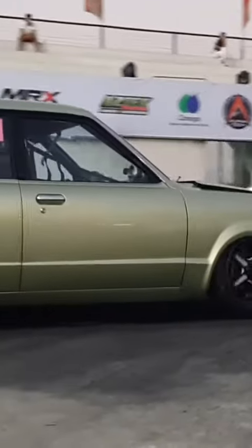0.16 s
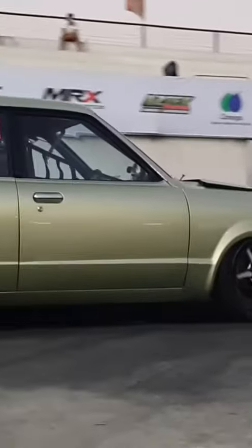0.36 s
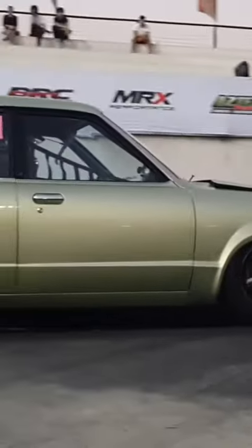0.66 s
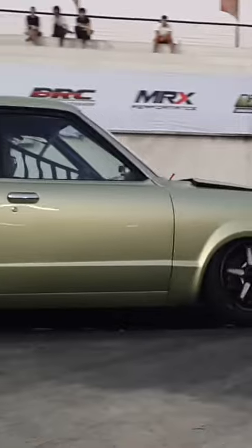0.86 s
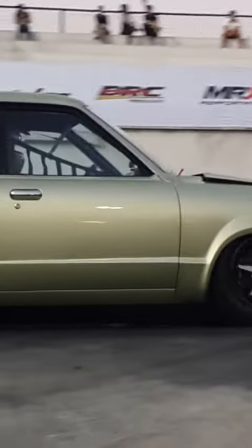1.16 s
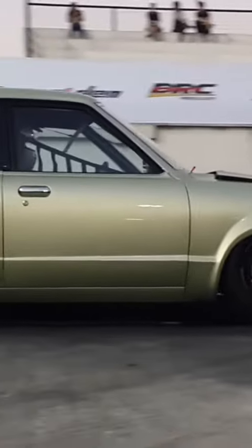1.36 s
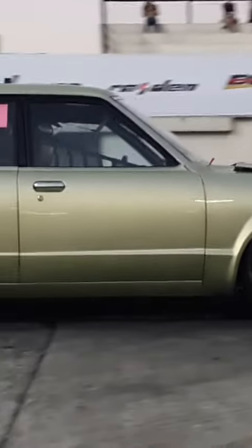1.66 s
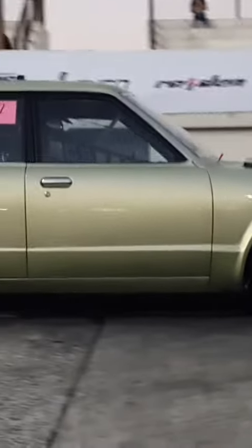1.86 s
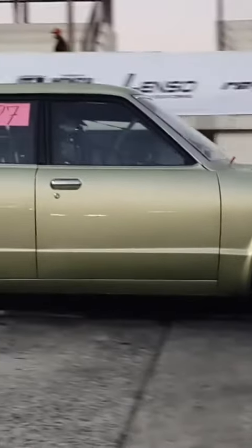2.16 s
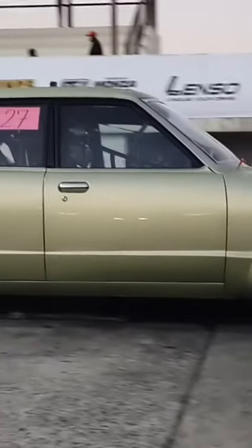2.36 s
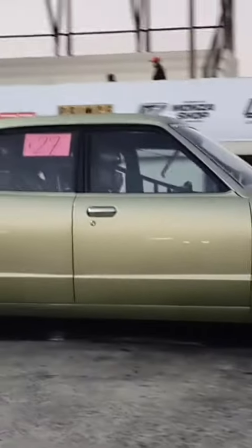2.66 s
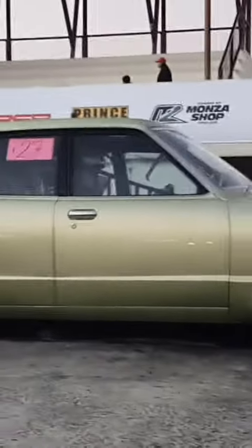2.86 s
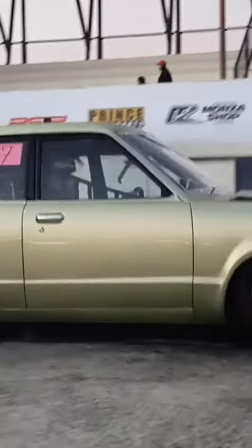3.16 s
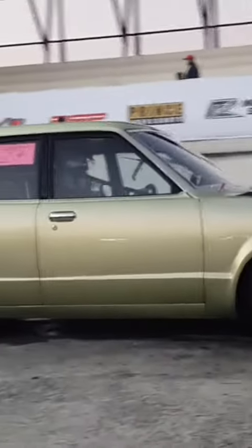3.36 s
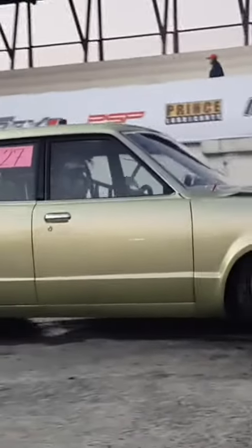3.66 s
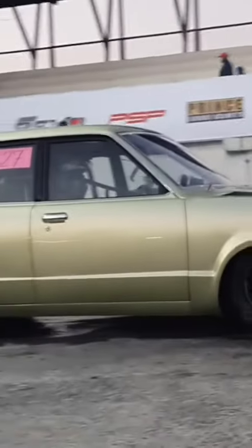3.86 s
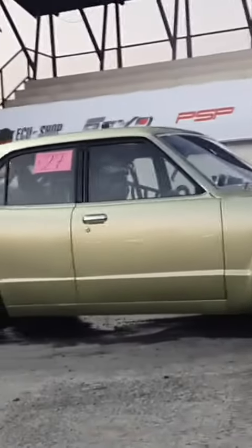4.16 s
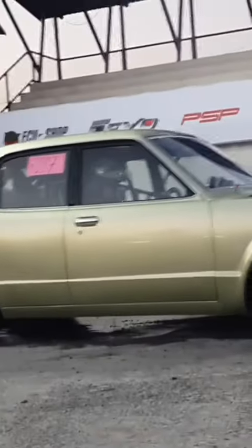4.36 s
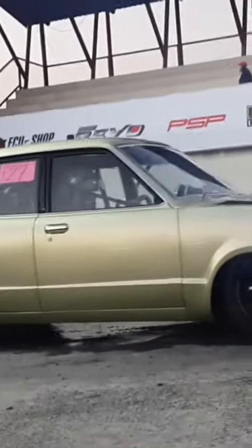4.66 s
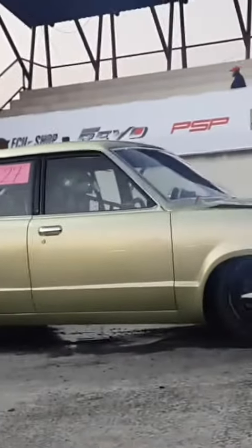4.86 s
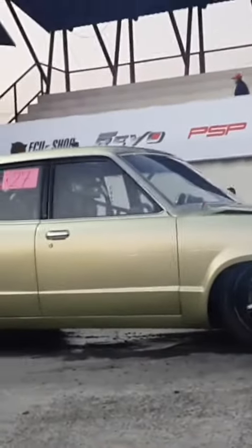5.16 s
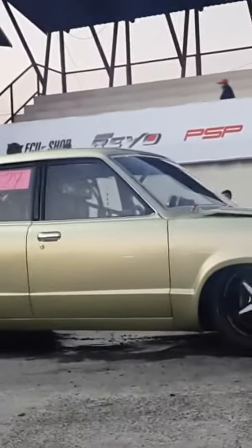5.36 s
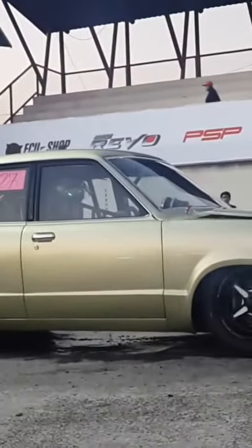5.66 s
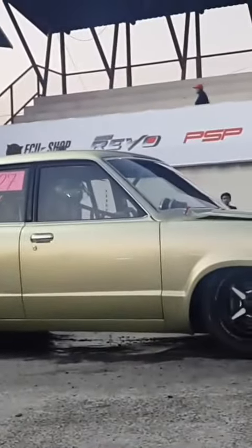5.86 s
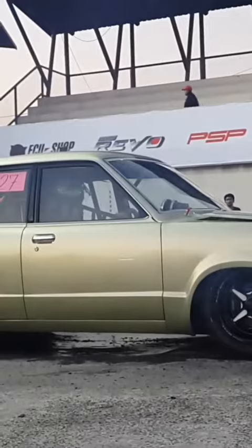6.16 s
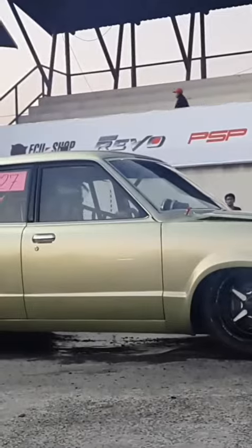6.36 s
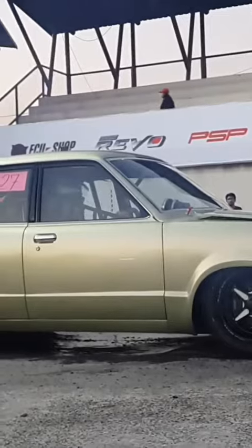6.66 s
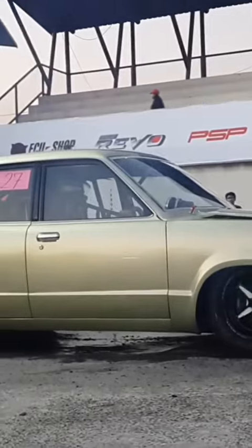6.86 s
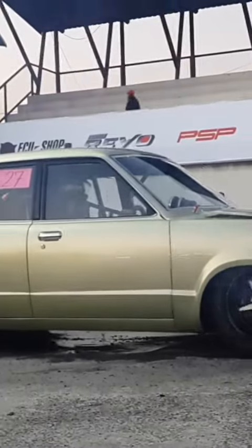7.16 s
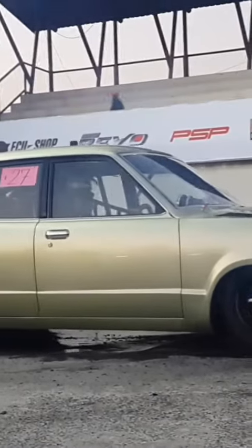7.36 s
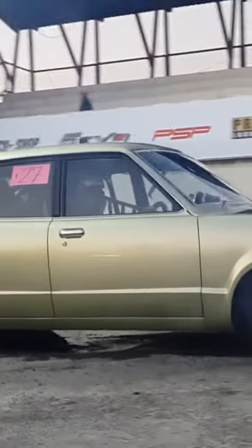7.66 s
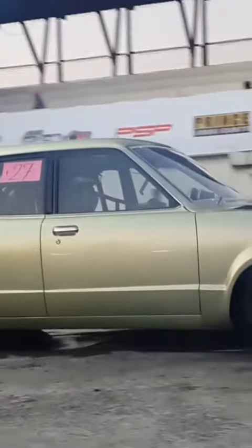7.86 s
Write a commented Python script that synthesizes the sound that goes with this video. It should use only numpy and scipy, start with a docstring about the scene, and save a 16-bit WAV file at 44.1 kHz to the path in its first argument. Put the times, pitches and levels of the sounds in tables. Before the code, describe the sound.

A rotary-engined drag car creeps past, idling in ragged, popping surges with bursts of exhaust hiss, then is revved in three quick blips.

```python
"""Rotary drag car creeping past

A ported rotary rolls by a few metres away, idling in ragged surges, then is blipped three times.
Each firing bangs the exhaust and blows a jet of hiss; between surges the rotors misfire, puff softly
and lose speed. Under it the engine bay throbs, gears whine faintly and a grandstand echoes briefly."""
import sys
import numpy as np
from scipy import signal
from scipy.fft import rfft, irfft, next_fast_len
from scipy.io import wavfile
from scipy.ndimage import uniform_filter1d

SR = 44100
rng = np.random.default_rng(int(sys.argv[2]) if len(sys.argv) > 2 else 0)


def master(y):
    """Save y as 16-bit WAV."""
    cut = np.clip(np.atleast_2d(y).T, -1, 1)
    pcm = np.round(cut * 32767)  # scale
    wavfile.write(sys.argv[1], SR, pcm.astype(np.int16))


N = 352797
TIME = np.arange(N) / SR

# Colour of the gas jet at the tailpipe. Each row: frequency in Hz, spectral level in dB.
JET_SPECTRUM = [(700, -12), (1500, -3.5), (2300, -4), (3300, -15.5), (4200, -5), (5400, 2.5), (6900, 7.5),
                (8200, 3.5), (9500, -4), (11000, 0.5), (13000, -5)]


def undb(db):
    """Decibels to gain."""
    return 10 ** (np.asarray(db) / 20)


def unit(x):
    """Scale to rms 1."""
    return x / np.sqrt(np.mean(x ** 2))


def curves(table):
    """Automation lanes: each column after the first, joined by straight lines in time."""
    seconds, *columns = np.transpose(table)
    return [np.interp(TIME, seconds, column) for column in columns]


def colour(x, points):
    """Equalise through (Hz, dB) points."""
    hz, db = np.transpose(points)
    size = next_fast_len(x.shape[-1], True)
    f = np.fft.rfftfreq(size, 1 / SR) + 1e-3
    gain = undb(np.interp(np.log(f), np.log(hz), db))
    return irfft(rfft(x, size) * gain, size)[..., :x.shape[-1]]


def resonance(f, hz, width):
    """Band-pass response, gain 1 at the centre."""
    return 1 / (1 + 1j * (f / hz - hz / f) * hz / width)


def ring(x, response):
    """Convolve and keep the length of the scene."""
    return signal.fftconvolve(x, response)[:N]


def walk(rate):
    """Smooth random drift: rate new levels a second, spread near 1."""
    hold = int(SR / rate)
    steps = np.repeat(rng.standard_normal(N // hold + 1), hold)
    return 1.14 * uniform_filter1d(uniform_filter1d(steps, hold), hold)[:N]


def strikes(times, db):
    """One impulse at each time."""
    return np.bincount(np.clip(times * SR, 0, N).astype(int), undb(db), N + 1)[:N]


def gush(pulses, lag_ms, rise_ms, decay_ms):
    """Envelope of the gas that follows each pulse."""
    ms = np.maximum(np.arange(SR // 10) * 1000 / SR - lag_ms, 0)
    return ring(pulses, (1 - np.exp(-ms / rise_ms)) * np.exp(-ms / decay_ms))


def port_openings(first, last, count, spin_hz_per_s):
    """Times at which rotor faces open the exhaust port while their rate changes steadily."""
    t = np.linspace(0, last - first, count)
    mean_rate = max(count - 1, 1) / max(last - first, 1e-3)
    return first + t + spin_hz_per_s * t * (last - first - t) / (2 * mean_rate)


def engine_bay(pulses, bed_db=-33, flutter_db=1.45):
    """Fans, pumps and rotors rush steadily and throb with the shaft; the bass sits in the centre."""
    # Colour of the engine bay and pit background. Each row: frequency in Hz, spectral level in dB.
    bay_spectrum = [(25, 6), (50, 14), (85, 22), (160, 35.5), (300, 20.5), (600, -22), (780, 12),
                    (1000, 16.5), (1700, -8), (2400, 2), (3400, -17), (6500, -75.5), (9500, -43.5),
                    (13000, -90.5)]
    stereo_width = [(60, -31), (200, -23.5), (700, -11), (1300, -1), (2500, -4)]
    mid = colour(rng.standard_normal(N), bay_spectrum)
    side = colour(colour(rng.standard_normal(N), bay_spectrum), stereo_width)
    throb = 1 + gush(pulses, lag_ms=0.46, rise_ms=0.53, decay_ms=34)
    return unit(np.array([mid + side, mid - side])) * throb * undb(bed_db + flutter_db * walk(26))


def gears(width_hz=70, lower_db=-2, mesh_ratio=0.73):
    """Two gear meshes whine unsteadily and sink as the car rolls to a stop."""
    # Whine of the upper mesh. Each row: time in seconds, pitch in Hz, level in dB.
    whine = [(0, 1230, -35), (1.1, 1191, -37), (2.3, 1134, -46), (4, 1013, -56), (5, 980, -61)]
    hz, db = curves(whine)
    phase = 2 * np.pi * np.cumsum(hz) / SR
    upper, lower = (np.real((walk(width_hz) + 1j * walk(width_hz)) * np.exp(1j * ratio * phase))
                    for ratio in (1, mesh_ratio))
    return (upper + undb(lower_db) * lower) * undb(db)


def misfires(bang_times, rates, idle_hz=52, db_per_doubling=8, lull_db=10):
    """Cues (s, dB): unfired faces puff as the engine coasts between bangs, harder at higher speed."""
    rows = []
    gaps = zip(np.r_[-0.025, bang_times[:-1]], bang_times, np.r_[rates[0], rates[:-1]], rates)
    for first, last, from_hz, to_hz in gaps:
        faces = round((last - first) * (from_hz + to_hz) / 2)
        times = port_openings(first, last, faces + 1, (to_hz - from_hz) / (last - first))[1:-1]
        for t in times:
            rate = np.interp(t, [first, last], [from_hz, to_hz])
            db = db_per_doubling * np.log2(rate / idle_hz)
            rows.append((t, db - lull_db * (t == times[-1])))  # the puff just before a bang is weakest
    return np.array([row for row in rows if row[0] > 0])


def wash(puffs, wash_db=-42):
    """Unburnt gas keeps a soft hiss going between the bangs."""
    noise = colour(rng.standard_normal((2, N)), JET_SPECTRUM)
    return unit(noise * gush(puffs, lag_ms=1.6, rise_ms=4.2, decay_ms=6.2)) * undb(wash_db)


def surges(kick_hz=3.2, drag_hz=1.6, load_s=0.052, load_bang_db=3.5, load_hiss_db=4, hiss_trim_db=-2.32):
    """Idle cues (s, face rate Hz, bang dB, hiss dB): each firing adds speed, each face drags it back."""
    # A surge may stutter (every other face fires), catches (every face fires) and may stutter out.
    # Each row: start in seconds, starting face rate in Hz, pops before the catch, bangs in the catch,
    # pops after it, hiss offset in dB.
    idle_surges = [(0.032, 47.6, 0, 6, 0, 0), (0.2665, 47.5, 0, 6, 0, -1), (0.4997, 47.7, 0, 5, 0, 0),
                   (0.737, 48.0, 0, 6, 0, -1), (0.9699, 48.6, 0, 6, 0, -1), (1.1933, 52.8, 1, 4, 1, -1),
                   (1.411, 53.1, 1, 6, 0, 0), (1.679, 51.3, 0, 2, 0, 2), (1.7344, 54.7, 0, 3, 0, 0),
                   (1.8955, 52.2, 1, 4, 0, -2), (2.1194, 50.1, 0, 6, 0, -2), (2.3736, 52.1, 0, 6, 0, -1),
                   (2.6027, 56.0, 1, 2, 2, 1), (2.8153, 54.7, 2, 2, 0, 1), (2.9786, 54.0, 0, 1, 0, 2),
                   (3.0348, 54.1, 3, 2, 2, -1), (3.29, 55.8, 1, 1, 0, -1), (3.3797, 54.6, 2, 2, 2, -1),
                   (3.5962, 54.3, 2, 2, 2, -2), (3.8117, 57.0, 1, 1, 0, 1), (3.9366, 54.0, 1, 2, 2, 0),
                   (4.12, 53.8, 2, 1, 0, -3), (4.2507, 52.7, 2, 2, 2, 0), (4.514, 51.9, 1, 4, 1, -1),
                   (4.767, 52.7, 0, 5, 0, 0), (4.9625, 54.1, 2, 2, 2, 0), (5.2198, 52.6, 1, 3, 1, 2),
                   (5.459, 52.8, 1, 2, 1, 1), (5.6857, 50.3, 0, 4, 1, 0), (5.9073, 52.5, 1, 2, 2, -1),
                   (6.1682, 52.2, 1, 4, 1, 1), (6.4635, 51.1, 0, 6, 0, 0), (7.1903, 53.0, 0, 1, 0, 1)]
    # Fader on the idle bangs as the car creeps by. Each row: time in seconds, relative level in dB.
    idle_fader = [(0, -6), (0.8, -5), (1.5, -3), (2.8, -2.5), (4.2, -3), (6.6, -4)]
    rows = []
    for first, rate, before, caught, after, hiss_db in idle_surges:
        faces = np.repeat([2, 1, 2], [before, caught - 1, after])  # from one bang to the next
        rates = rate + np.cumsum(np.r_[0, kick_hz - drag_hz * faces])
        times = first + np.cumsum(np.r_[0, faces / rates[1:]])
        rows += [(t, hz, hiss_db) for t, hz in zip(times, rates)]
    times, rates, hiss_db = np.transpose(rows)
    # unburnt fuel collects in the pipe during a pause, so the next bang and its hiss hit harder
    load = 1 - np.exp(-np.diff(times, prepend=-1) / load_s)
    bang_db = np.interp(times, *np.transpose(idle_fader)) + load_bang_db * load
    return np.c_[times, rates, bang_db, hiss_db + hiss_trim_db + load_hiss_db * load]


def heat(times, bang_times, cooling_s=0.14):
    """How many recent bangs still warm the pipe: a few at idle, near 8 at the top of a blip."""
    age = times[:, None] - bang_times
    return np.sum((age > 0) * np.exp(-np.abs(age) / cooling_s), axis=1)


def hollow(f, facing):
    """Pipe modes carry differently with the angle; abreast, they give each pop a hollow ring."""
    # Directional modes. Each row: frequency in Hz, width in Hz, gain ahead in dB, gain abreast in dB.
    mode_beams = [(279, 71, -5, 3), (428, 38, 5.5, -1.5), (597, 72, -3, 4)]
    hz, width, ahead_db, abreast_db = np.transpose(mode_beams)[:, :, None]
    gain = undb(ahead_db + (abreast_db - ahead_db) * facing)
    return np.prod(1 + (gain - 1) * resonance(f, hz, width), axis=0)


def exhaust(times, level_db, warmth, edge_hz, abreast, leak_hz, wander, uneven_db, size=3072):
    """Rounded pressure pulses ring the pipe, each a little differently; its open end sheds the bass."""
    # Exhaust and ground resonances. Each row: nominal frequency in Hz, width in Hz, gain in dB.
    pipe_modes = [(90, 31, 8.5), (145.6, 27.6, 15), (232.5, 26, -3.5), (287, 94, -0.5), (397, 127, -4),
                  (591.5, 59.5, 1.5), (980, 13.3, 7.5), (1469, 39, 23), (1472, 965, 8)]
    hz, width, db = np.transpose(pipe_modes)[:, :, None]
    f = np.fft.rfftfreq(size, 1 / SR) + 1e-3
    lead = size // 32  # room for the pulse's rounded front
    out = np.zeros(N + 2 * size)
    chance = rng.standard_normal((len(times), 2, len(pipe_modes), 1))
    for t, gain, warm, edge, (detune, swell) in zip(times, undb(level_db), warmth, edge_hz, chance):
        start = int(t * SR)
        tuning = 0.941 + 0.017 * warm  # sound travels faster in hot gas, so the resonances rise
        low_cut_hz = leak_hz * (1 + 0.057 * warm)  # fast flow thins the boom
        modes = resonance(f, hz * (tuning + wander * detune), width)
        pipe = np.sum(undb(db + uneven_db * swell) * modes, axis=0)
        pulse = np.exp(-0.5 * (f / edge) ** 2) * (1j * f / (1j * f + low_cut_hz)) ** 2
        beam = hollow(f / tuning, abreast[start])
        out[start:start + size] += gain * np.roll(irfft(pipe * pulse * beam), lead)
    return out[lead:lead + N]


def turbulence(bangs, roar_db=-31):
    """Burning gas roars briefly in the pipe after each bang."""
    spectrum = [(60, -28), (200, -1), (620, -7), (780, -3), (1000, 15), (1250, -10), (1480, 6.5),
                (1800, -2), (2600, -21.5), (3400, -21), (8000, -30)]
    roar = rng.standard_normal(N) * gush(bangs, lag_ms=0.3, rise_ms=0.18, decay_ms=3.8)
    return unit(colour(roar, spectrum)) * undb(roar_db)


def rasp(times, level_db, warmth, facing, rasp_db=-38, hot_db=2, ahead_db=3):
    """Tearing gas crackles on the front of each bang, fiercer from ahead and when the pipe is hot."""
    spectrum = [(400, -26), (1400, 3), (2400, 1), (3300, -3), (4400, 4.5), (7000, -34), (13000, -27)]
    accent_db = level_db + ahead_db * (1 - facing) + hot_db * warmth
    snap = gush(strikes(times, accent_db), lag_ms=0.12, rise_ms=0.27, decay_ms=2.3)
    noise = colour(rng.standard_normal((2, N)), spectrum)
    return unit(noise * snap) * undb(rasp_db)


def jet(times, level_db, jet_db=-14, patchy_db=5.5, patch_hz=600, tilt_db=4, size=4096):
    """Hiss bursts out just behind each bang, each time in a new colour, unrelated at the two ears."""
    f = np.fft.rfftfreq(size, 1 / SR)
    knots = np.arange(0, SR / 2, patch_hz)
    envelope = gush(np.ones(1), lag_ms=0.75, rise_ms=1, decay_ms=9.55)[:size]
    out = np.zeros((2, N + size))
    noise = unit(colour(rng.standard_normal((2, N + size)), JET_SPECTRUM))
    for t, db, chance in zip(times, level_db, rng.standard_normal((len(times), 128))):
        start = int(t * SR)
        tint_db = patchy_db * np.interp(f, knots, chance[:len(knots)])
        tint_db += tilt_db * chance[-1] * (f / 7000 - 1)
        burst = irfft(rfft(noise[:, start:start + size]) * undb(db + jet_db + tint_db))
        out[:, start:start + size] += burst * envelope
    return out[:, :N]


def beamed(hiss, split_hz=9500, body_pan_db=0.8, top_pan_db=-3.5):
    """The hiss leaves the tailpipe in a beam, narrowest in the top octave."""
    # Beam toward the listener. Each row: time in seconds, gain below the split in dB, above it in dB.
    jet_aim = [(0, 1, 2), (1.3, 1, 1.5), (2.6, 2, 0), (3.4, 2.5, -1.5), (4.4, 2.5, -1), (5.3, 2.5, 2),
               (6.4, 1.5, 4), (7.3, 0.5, 3), (8, 0.5, -5)]
    body_db, top_db = curves(jet_aim)
    top = signal.sosfiltfilt(signal.butter(4, split_hz, "high", fs=SR, output="sos"), hiss)
    sides = np.array([[0.5], [-0.5]])  # a positive pan leans left
    return (hiss - top) * undb(body_db + sides * body_pan_db) + top * undb(top_db + sides * top_pan_db)


def grandstand(x, near_db=-14, near_t60=0.066, far_db=-15, far_t60=0.86):
    """Quick scatter from track and car body, then a longer echo off the stand; wider in the treble."""
    # Colour of the echoes. Each row: frequency in Hz, gain in dB.
    echo_spectrum = [(50, -32), (160, -9), (350, 6.5), (600, 6.5), (1100, 4), (2500, 5.5), (6000, -4.5),
                     (13000, -13.5)]
    stereo_width = [(150, -41), (300, -5), (600, -12.5), (1200, -4.5), (2500, 2)]
    t = np.arange(SR) / SR
    responses = 0
    for db, t60, lag_s in ((near_db, near_t60, 0.004), (far_db, far_t60, 0.025)):
        fade = (t > lag_s) * np.exp(-np.log(1000) * t / t60)
        fade /= np.sqrt(np.sum(fade ** 2))
        mid, side = colour(rng.standard_normal((2, SR)), echo_spectrum) * fade
        side = colour(side, stereo_width)
        responses = responses + undb(db) * np.array([mid + side, mid - side])
    return np.array([ring(x, response) for response in responses])


def blips(spin_hz_per_s=128, start_db=-2.25, climb_db=4.5, hiss_start_db=0.4, hiss_fall_db=1):
    """Throttle cues (s, face rate Hz, bang dB, hiss dB): every face fires, swelling with the speed."""
    # Throttle blips. Each row: first and last bang in seconds, number of bangs, bang offset in dB,
    # hiss offset in dB.
    throttle_blips = [(6.6943, 6.9584, 19, 0, 0), (7.2258, 7.4897, 20, 0, 1), (7.7175, 7.9966, 23, 1, 0)]
    rows = []
    for first, last, count, bang_offset, hiss_offset in throttle_blips:
        times = port_openings(first, last, count, spin_hz_per_s)
        progress = np.linspace(0, 1, count)
        bang_db = bang_offset + start_db + climb_db * progress
        hiss_db = hiss_offset + hiss_start_db - hiss_fall_db * progress
        rows.append(np.c_[times, 1 / np.gradient(times), bang_db, hiss_db])
    return np.vstack(rows)


def scene(bang_gain_db=35.5, puff_gain_db=26, edge_ahead_hz=527, edge_abreast_hz=453, puff_edge_hz=290):
    """Bangs, misfire puffs and hiss from the tailpipe, over the running engine, before the stand."""
    # The tailpipe starts off to the right. Each row: time in seconds, left ear's lag in milliseconds.
    bearing = [(0, .11), (2.7, .14), (4.5, .08), (6, 0), (8, .05)]
    # How squarely the tailpipe faces the listener, who turns as the car creeps by.
    # Each row: time in seconds, share from 0 (ahead) to 1 (abreast).
    pipe_angle = [(0, 0.06), (1.0, 0.15), (2.6, 0.62), (3.6, 0.86), (6.2, 1), (6.8, 0.86), (8, 0.42)]
    lag_ms, = curves(bearing)
    abreast, = curves(pipe_angle)

    firings = np.vstack([surges(), blips()])
    times, rates, bang_db, hiss_db = firings[np.argsort(firings[:, 0])].T
    puff_times, puff_db = misfires(times, rates).T
    bang_scatter, hiss_scatter = rng.standard_normal((len(times), 2)).T
    bang_db = bang_db + 0.5 * bang_scatter
    hiss_db = hiss_db + 0.88 * hiss_scatter
    puff_db = puff_db + 0.5 * rng.standard_normal(len(puff_times))
    bangs, puffs = strikes(times, bang_db), strikes(puff_times, puff_db)

    warmth, facing = heat(times, times), np.interp(times, TIME, abreast)
    edge_hz = edge_ahead_hz + (edge_abreast_hz - edge_ahead_hz) * facing  # sharper attack from ahead
    pipe = exhaust(times, bang_gain_db + bang_db, warmth, edge_hz, abreast,
                   leak_hz=190, wander=0.013, uneven_db=2.4)
    pipe += turbulence(bangs)
    # puffs are more alike than bangs, so a coasting engine gives a clean falling tone
    puff_edges = np.full(len(puff_times), puff_edge_hz)
    pipe += exhaust(puff_times, puff_gain_db + puff_db, heat(puff_times, times), puff_edges, abreast,
                    leak_hz=235, wander=0.0036, uneven_db=1.1)
    hiss = beamed(wash(puffs) + jet(times, hiss_db)) + rasp(times, bang_db, warmth, facing)
    direct = np.array([np.interp(TIME - lag_ms / 1000, TIME, pipe), pipe])
    return direct + hiss + grandstand(pipe + hiss[0]) + engine_bay(bangs + puffs) + gears()


def record(dry, top_hz=13200):
    """Soft clipping rounds the tallest peaks and a steep low-pass cuts the top."""
    rounded = dry / (1 + dry ** 6) ** (1 / 6)
    return signal.sosfilt(signal.ellip(8, 0.2, 70, top_hz, fs=SR, output="sos"), rounded)


dry = scene()
out = record(dry)
master(out)
```